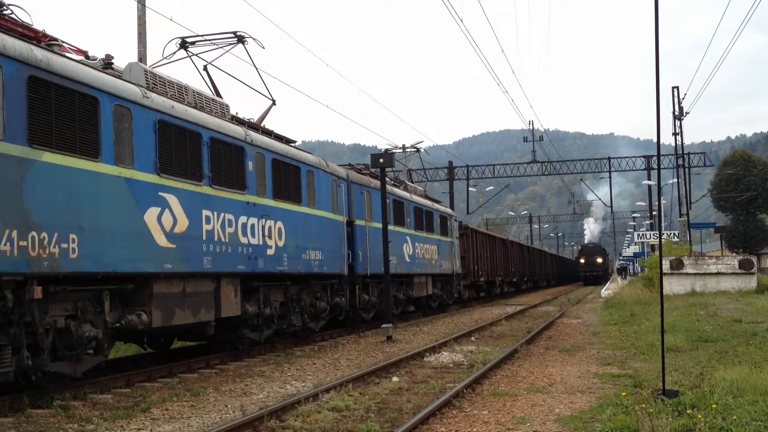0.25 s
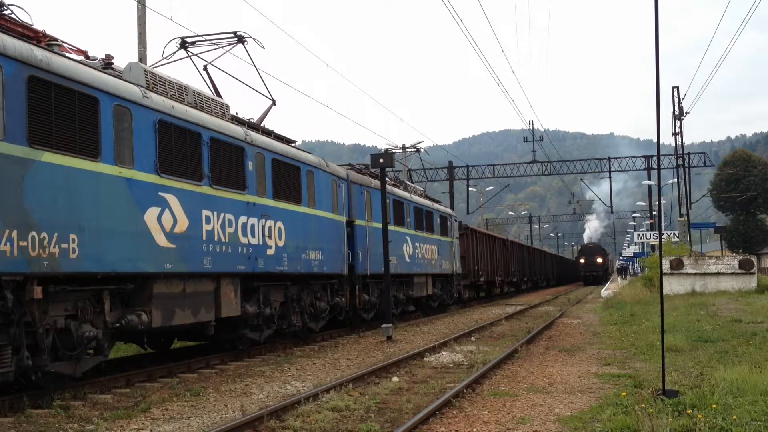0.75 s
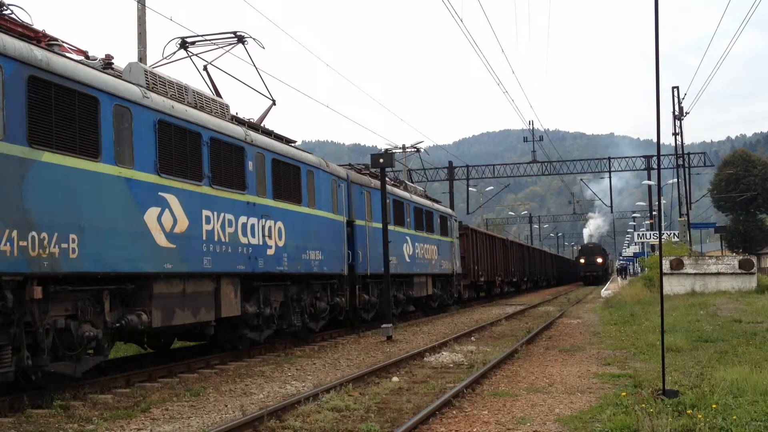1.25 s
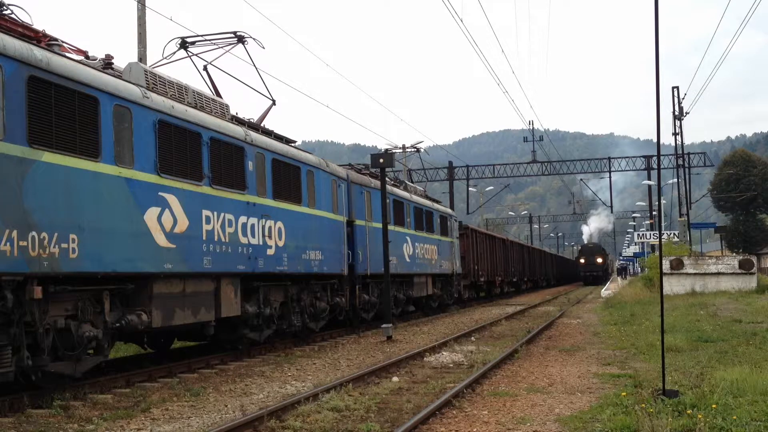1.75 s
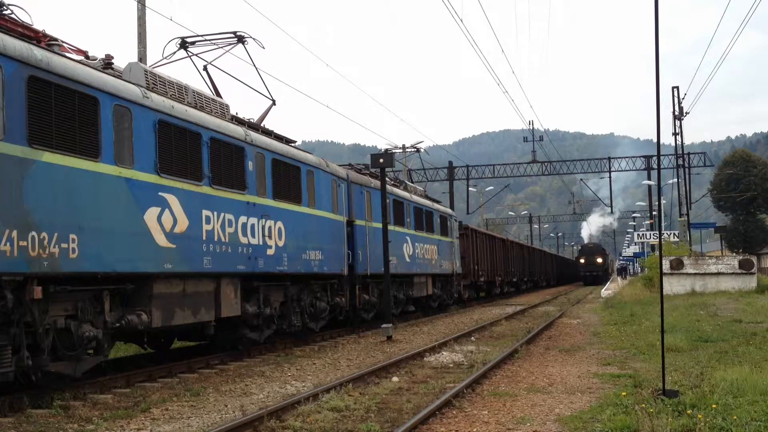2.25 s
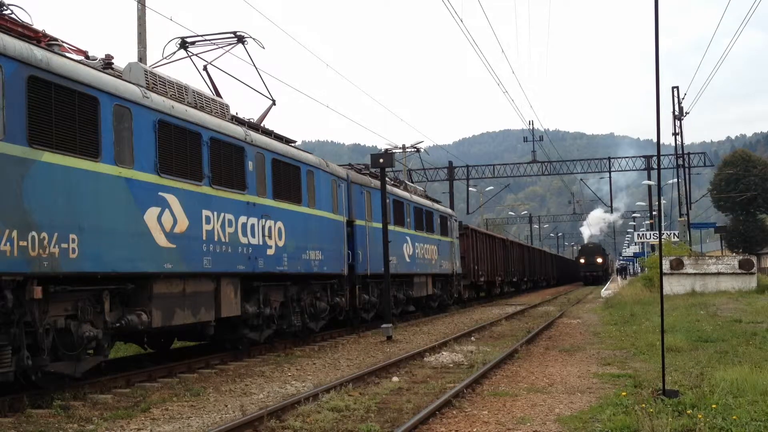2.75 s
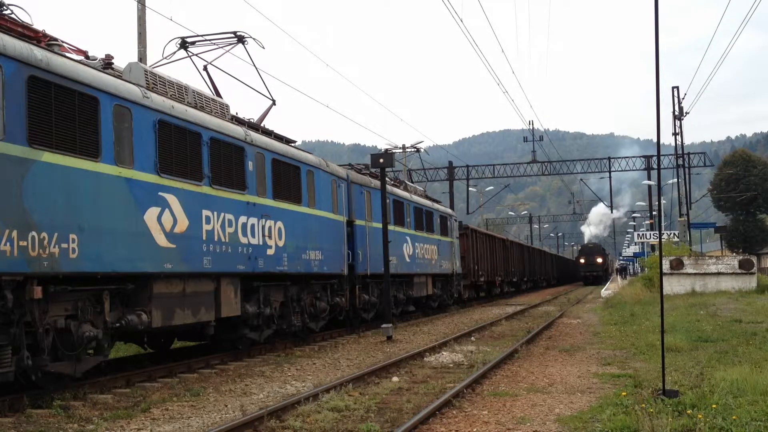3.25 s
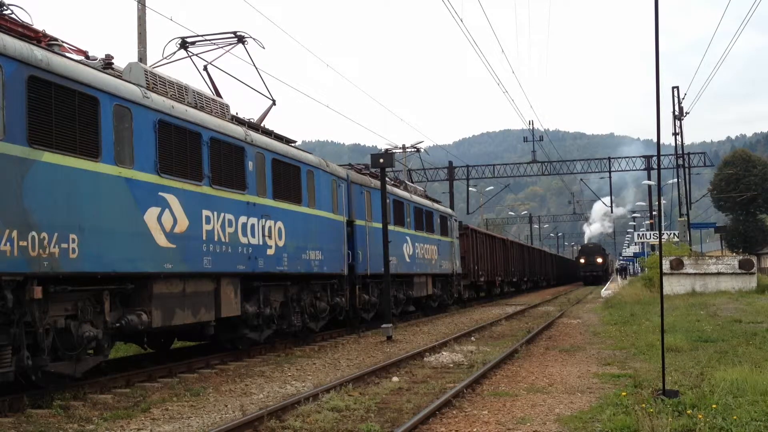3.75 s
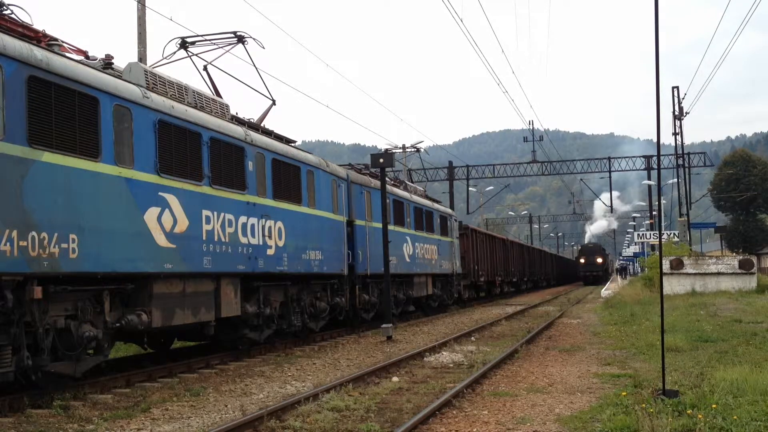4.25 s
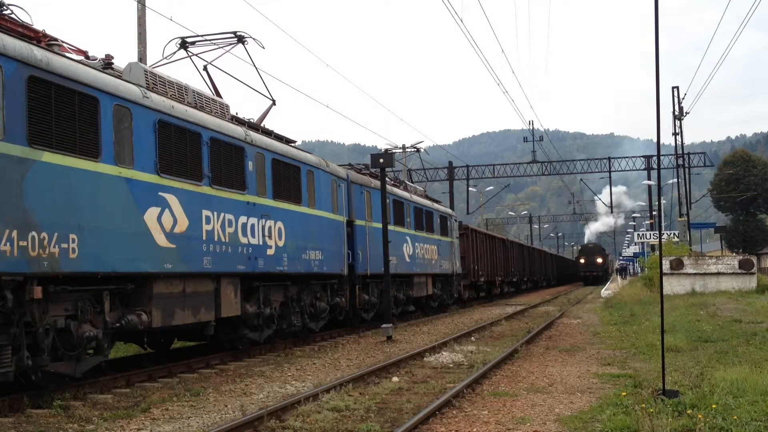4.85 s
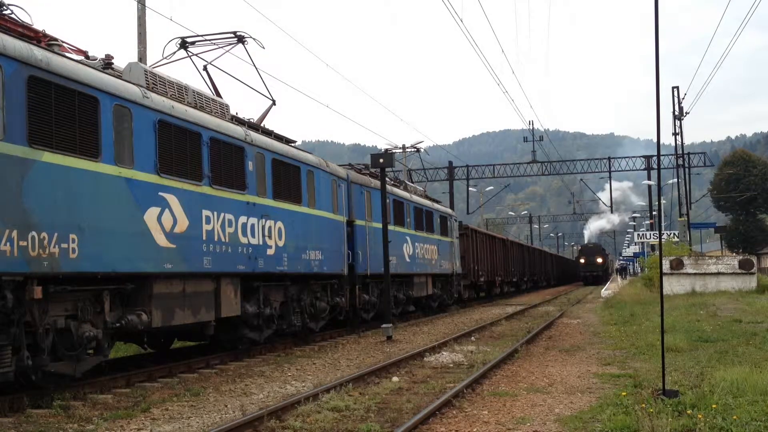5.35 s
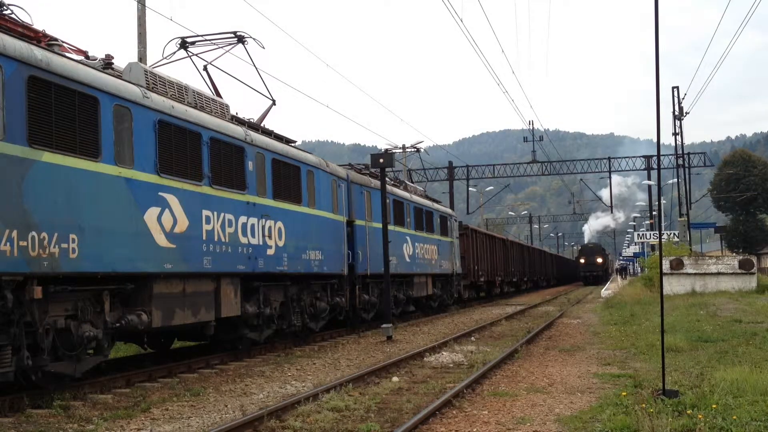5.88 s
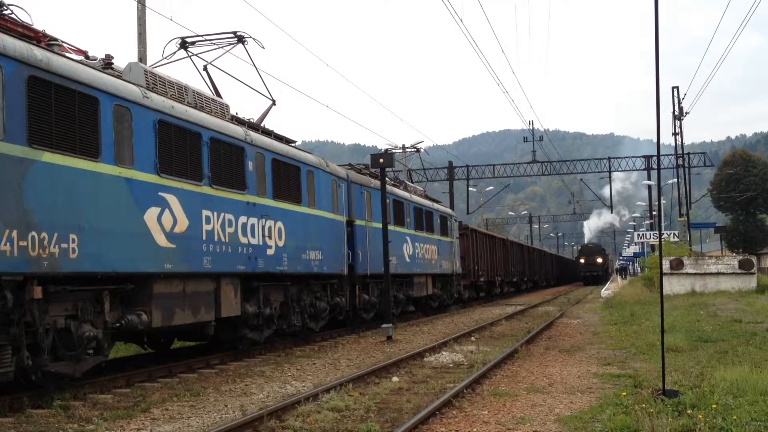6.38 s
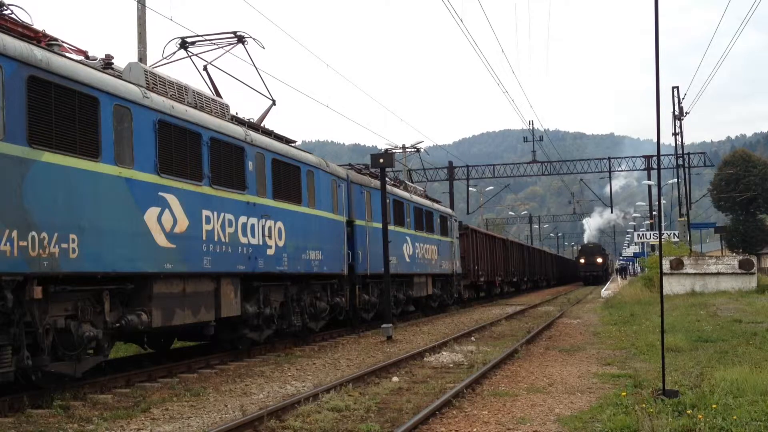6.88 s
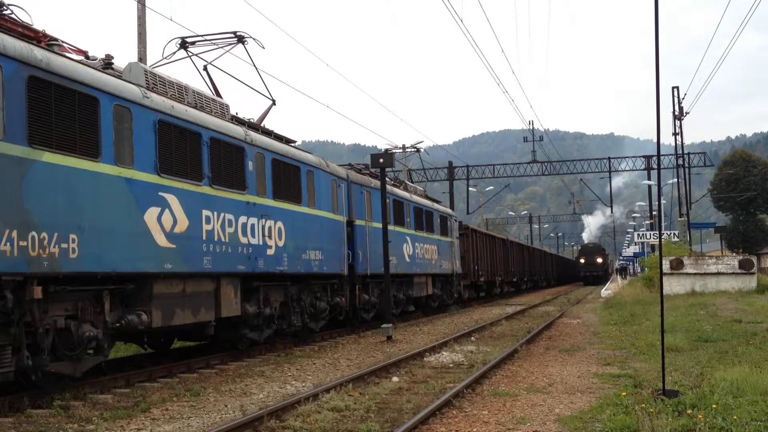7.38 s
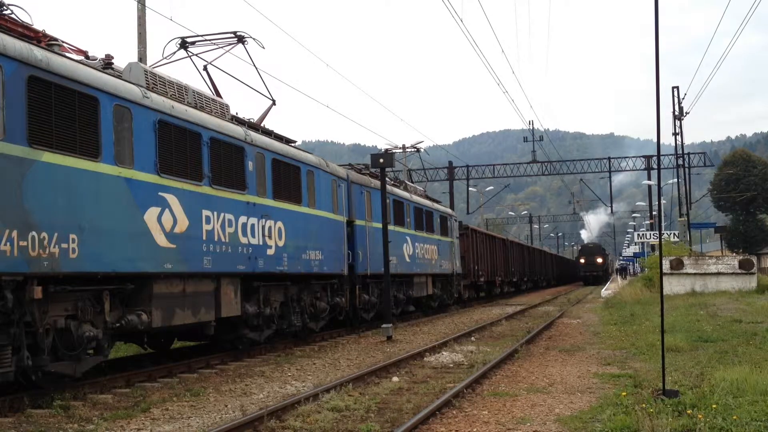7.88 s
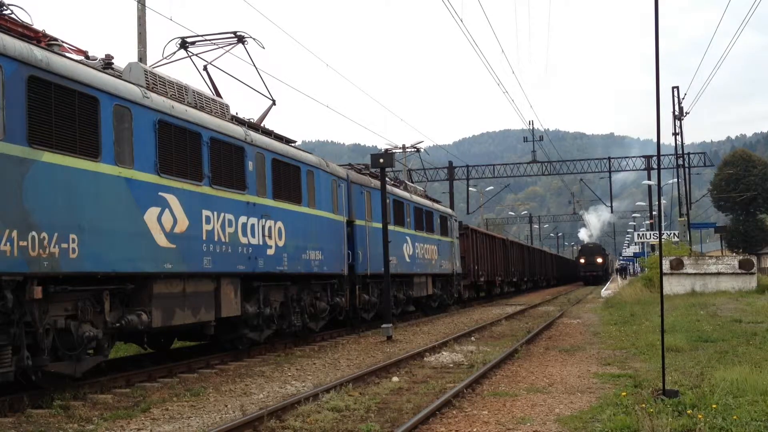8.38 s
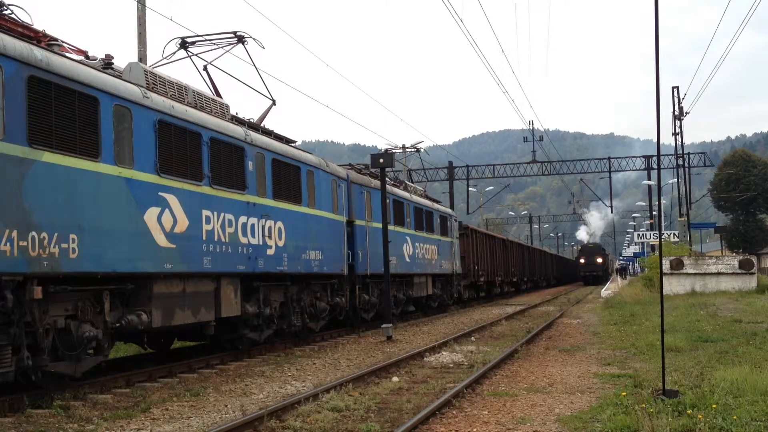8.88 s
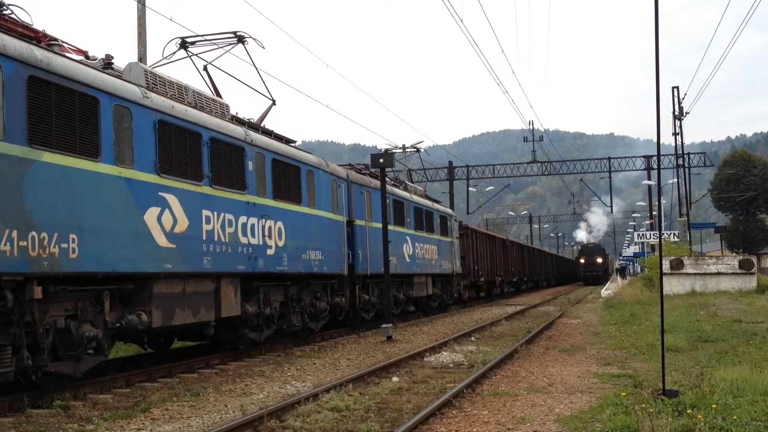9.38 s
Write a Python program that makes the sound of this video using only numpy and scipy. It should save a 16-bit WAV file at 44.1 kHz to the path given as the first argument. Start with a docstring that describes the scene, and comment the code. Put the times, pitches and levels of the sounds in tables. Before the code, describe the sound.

From 0 to about 9.6 seconds, the cooling blowers of a standing electric locomotive run without pause, heard in mono from a few metres away outdoors at a station. A low, hollow roar, strongest around 200 Hz, dominates and surges unevenly by small amounts; its deepest part fills out around 3.5 to 6 seconds. Above it, air rushes through ducts and louvres with a coloured, swirling texture. A wavering hum near 600 Hz sinks very slightly around 2.5 seconds and becomes clearer from 3 seconds on, with a weaker drifting tone beside it and faint higher whines. Motor brushes add a fine hiss around 4 kHz, fluttering about seventeen times a second. Dull air puffs knock the microphone at 2.5, 4.4 (strongest), then lightly from 5.3 to 6.3. Faint upward-sliding pips, almost buried, come near 0.5, 1.4, 3.8, 4.1, 8.3 and 8.8. It ends still running.

```python
"""At a station, a few metres from a standing electric locomotive with its cooling blowers running.
Shaped noise makes the low roar in the body and the rush of air through ducts and louvres. Wavering sines
hum near 600 Hz and above. The motor brushes hiss in a slowly changing pattern tied to the shaft turn.
A few dull puffs of air, short decaying swings, knock the microphone; faint sliding pips sound far off."""
import sys
import numpy as np
from scipy import signal
from scipy.fft import rfft, irfft
from scipy.io import wavfile
from scipy.ndimage import uniform_filter1d, map_coordinates

SR = 44100
rng = np.random.default_rng(int(sys.argv[2]) if len(sys.argv) > 2 else 0)


def volts_from_db(level):
    """Convert decibel levels to linear amplitude ratios."""
    exponent = np.asarray(level, float) / 20
    return 10 ** exponent


def put_to_file(sound):
    """Save the sound as 16-bit audio at rate SR, in the file named by the first command-line argument."""
    columns = np.atleast_2d(sound).T  # one column per channel
    safe = np.clip(columns, -1, 1)
    whole_steps = np.round(safe * 32767)
    wavfile.write(sys.argv[1], SR, whole_steps.astype(np.int16))


N = 424683
T = np.arange(N) / SR
BIN_HZ = np.arange(N // 2 + 1) * SR / N


def level(x, rms_db):
    """Scale to an rms level."""
    return x * volts_from_db(rms_db) / np.sqrt(np.mean(x ** 2))


def colour(x, points, peaks=()):
    """Shape a sound by a smooth spectrum with resonances standing on it."""
    hz = np.maximum(BIN_HZ, 1)
    at_hz, db = np.transpose(points)
    power = volts_from_db(np.interp(np.log(hz), np.log(at_hz), db, left=-70, right=-70)) ** 2
    for peak_hz, width_hz, peak_db in peaks:
        detune = 2 * (hz - peak_hz) / width_hz
        power = power * (1 + (volts_from_db(peak_db) ** 2 - 1) / (1 + detune ** 2))
    return irfft(rfft(x) * np.sqrt(power), N)


def walk(rate_hz):
    """Random levels held 1 / rate_hz and smoothed twice over that span; standard deviation 1."""
    hold = int(SR / rate_hz)
    steps = np.repeat(rng.standard_normal(N // hold + 1), hold)
    smooth = uniform_filter1d(uniform_filter1d(steps, hold), hold)[:N]
    return smooth / smooth.std()


def roar():
    """Turbulence off the impellers booms in the body and surges unevenly; its deepest part has its own level."""
    # roar level: time_s, rms_db
    surge = [(0, -29.5), (1.5, -27.5), (2.8, -28.5), (3.3, -30), (4.0, -27.5), (5.2, -29), (6.3, -27.5),
             (7.2, -28.5), (8.6, -29), (9.63, -27.5)]
    # smooth spectrum: pitch_hz, relative_db_per_hz
    spectrum_points = [(15, -75), (25, -45), (37, -45.5), (59, -29), (72, -26), (91, -13.5), (119, -10),
                       (137, -7), (203, 0), (270, -6.5), (355, -13.5), (485, -25.5), (560, -41), (730, -48),
                       (1230, -120)]
    # body booms: pitch_hz, width_hz, db_over_roar
    body_booms = [(146.4, 6.1, 2.5), (178.7, 6.9, 4), (213, 12, 1.5), (270, 12, 1), (288, 9.6, 1.5),
                  (341, 12, 1)]
    # gain of the deepest roar: time_s, gain_db
    deep_gain = [(0, -2.5), (2.2, -2), (3.2, 0), (3.7, 2.5), (4.4, 1.5), (4.8, 1), (5.6, 1.5), (7, -0.8),
                 (9.63, -1)]
    deep_below_hz = 143

    flutter = volts_from_db(0.36 * walk(rate_hz=15) + 0.96 * walk(rate_hz=3.49))
    boom = level(colour(flutter * rng.standard_normal(N), spectrum_points, body_booms), 0)
    low_pass = signal.butter(2, deep_below_hz, fs=SR, output="sos")
    deep = signal.sosfiltfilt(low_pass, boom)
    extra_deep = (volts_from_db(np.interp(T, *np.transpose(deep_gain))) - 1) * deep
    return volts_from_db(np.interp(T, *np.transpose(surge))) * (boom + extra_deep)


def air(turns):
    """The rush off the blades through ducts and louvres, swelling a little and throbbing once a shaft turn."""
    # smooth spectrum: pitch_hz, relative_db_per_hz
    spectrum_points = [(250, -32), (480, 0), (620, -3.5), (740, -7), (1000, -1.5), (1500, -6), (2200, -8),
                       (2900, -14.5), (3800, -15.5), (5200, -24.5)]
    # duct resonances: pitch_hz, width_hz, db_over_rush
    duct_modes = [(612, 31, 9), (879, 23, 6), (898, 19, 2), (1038, 18, 5.5), (1110, 62, 3.5), (1361, 61, 8),
                  (1864, 84, 4), (2332, 41, 7.5), (2720, 27, 5), (3100, 59, 7.5), (3344, 24, 6.5),
                  (3490, 37, 9)]

    throb = 1 + 0.07 * np.cos(2 * np.pi * (turns - 0.88))
    swell = volts_from_db(0.5 * walk(rate_hz=3.08))
    rush = colour(swell * turning_noise(turns, throb), spectrum_points, duct_modes)
    return level(panels(swirl(rush), ripple_db=0.4, spacing_hz=25), rms_db=-40.5)


def swirl(x):
    """Eddies in the ducts: overlapping bands a fifth of an octave apart swell and sink on their own."""
    swirl_db, swirl_rate_hz, spacing_octaves = 1.2, 9, 0.2
    octave = np.log2(np.maximum(BIN_HZ, 1))
    spectrum = rfft(x)
    out = x.copy()
    for centre in np.arange(9.5, 11.9, spacing_octaves):  # log2 of Hz
        weight = np.clip(1 - np.abs(octave - centre) / spacing_octaves, 0, 1)
        band = irfft(spectrum * weight, N)
        out += (volts_from_db(swirl_db * walk(swirl_rate_hz)) - 1) * band
    return out


def hum():
    """The main hum sinks a little, a second blower's hum wanders beside it, weaker tones stand above."""
    # main hum pitch: time_s, pitch_hz
    main_pitch = [(0, 601.2), (2.4, 601.0), (2.8, 599.6), (9.63, 599.0)]
    # main hum strength: time_s, rms_db
    main_strength = [(0, -48), (1, -47.5), (2, -48), (2.6, -46), (3.4, -44.5), (4.6, -43), (5.7, -44.5),
                     (7, -43), (8.2, -42.5), (9.3, -43.5), (9.63, -44.5)]
    # second blower's hum: time_s, pitch_hz, rms_db
    second_blower = [(0, 623, -53), (2, 629.5, -63), (4, 630.6, -52.5), (6.5, 623, -62), (8, 627, -53),
                     (9.63, 618, -54)]
    # weaker tones: pitch_hz, rms_db
    weak_tones = [(1359, -61.5), (1976, -68)]

    main_hz = np.interp(T, *np.transpose(main_pitch))
    main_db = np.interp(T, *np.transpose(main_strength))
    out = tone(main_hz, main_db, waver_db=1.2, waver_hz=0.1)
    time_s, pitch_hz, rms_db = np.transpose(second_blower)
    second_hz = np.interp(T, time_s, pitch_hz)
    second_db = np.interp(T, time_s, rms_db)
    out = out + tone(second_hz, second_db, waver_db=4, waver_hz=2.5)
    for hz, db in weak_tones:
        out = out + tone(hz, db, waver_db=5.5, waver_hz=1.55)
    return out


def tone(hz, rms_db, waver_db, waver_hz):
    """A sine whose strength and pitch waver slightly on the way through the air."""
    phase = 2 * np.pi * np.cumsum(hz + waver_hz * walk(rate_hz=6)) / SR
    return np.sqrt(2) * volts_from_db(rms_db + waver_db * walk(rate_hz=9)) * np.sin(phase)


def brushes(turns):
    """Brush hiss that swells with the shaft's runout and flares briefly at each rough commutator spot."""
    # smooth spectrum: pitch_hz, relative_db_per_hz
    spectrum_points = [(1500, -18), (3000, -10.5), (3900, -11), (4230, -1), (4450, 0.5), (4800, -6.5),
                       (4950, -14), (5800, -18.5), (7500, -15.5), (8300, -25.5), (9000, -35), (10000, -26),
                       (11000, -44), (15250, -38)]
    # brush gear resonances: pitch_hz, width_hz, db_over_hiss
    gear_modes = [(4120, 20, 3), (4244, 16, 5), (4347, 12, 5), (4569, 18, 4), (4697, 25, 4.5),
                  (4800, 12, 5.5), (6640, 100, 4)]
    # rough spots: place_turns (0-1), scrape_db over the smooth hiss
    rough_spots = [(.05, -3), (.135, 0), (.195, 1.5), (.315, -2), (.5, -2), (.59, -5), (.835, -3)]
    flare_fade_turns = 0.022

    power = 1 + 0.3 * np.cos(2 * np.pi * (turns - 0.25))
    for place, scrape_db in rough_spots:
        since_spot = (turns - place) % 1
        power = power + volts_from_db(scrape_db) ** 2 * np.exp(-since_spot / flare_fade_turns)
    scrape = colour(turning_noise(turns, np.sqrt(power)), spectrum_points, gear_modes)
    return level(panels(scrape, ripple_db=0.8, spacing_hz=25), rms_db=-48)


def shaft_turns():
    """Turns made so far; the blower shaft slows steadily and trembles very slightly."""
    start_hz, sag_hz_per_s, tremble_hz = 16.969, 0.0136, 0.002
    return np.cumsum(start_hz - sag_hz_per_s * T + tremble_hz * walk(rate_hz=4)) / SR


def turning_noise(turns, shape):
    """Noise off a rotor: partly the same surface passing again and slowly changing, partly fresh."""
    # share of power from the returning surface: pitch_hz, share (0-1)
    returning = [(500, .1), (1200, .15), (2000, .2), (3000, .4), (4500, .5), (6500, .52), (10000, .45)]
    points_per_turn, memory = 2600, 0.96  # memory: correlation from turn to turn

    rows = rng.standard_normal((int(turns[-1]) + 2, points_per_turn))
    for k in range(1, len(rows)):
        rows[k] = memory * rows[k - 1] + np.sqrt(1 - memory ** 2) * rows[k]
    surface = level(map_coordinates(rows.ravel(), [turns * points_per_turn], order=3), 0)
    share = np.interp(BIN_HZ, *np.transpose(returning))
    repeated = np.sqrt(share) * rfft(shape * surface)
    fresh = np.sqrt(1 - share) * rfft(shape * rng.standard_normal(N))
    return irfft(repeated + fresh, N)


def panels(x, ripple_db, spacing_hz):
    """Countless small panel modes and echoes make the spectrum ragged."""
    k = int(spacing_hz * N / SR)
    ripple = uniform_filter1d(uniform_filter1d(rng.standard_normal(N // 2 + 1), k), k)
    return irfft(rfft(x) * volts_from_db(ripple_db * ripple / ripple.std()), N)


def puffs():
    """Short dull pushes of air swing for a few cycles toward a resting pitch; the microphone cuts their bass."""
    # puffs: start_s, peak_db before the bass cut, start_hz, direction (+-1), fade_ms
    pushes = [(2.5263, -17, 560, 1, 1.5), (2.5276, -19, 800, 1, 1.5), (2.5284, -9, 195, -1, 11),
              (2.5302, -19, 620, 1, 4), (4.3630, -15, 690, 1, 2.8), (4.3675, -19, 180, 1, 10),
              (4.4403, -6.5, 320, 1, 4.5), (5.2621, -21, 540, 1, 4), (5.7140, -17.5, 480, 1, 4),
              (5.8414, -17.5, 290, -1, 6), (5.9780, -13, 230, 1, 8), (6.271, -23.5, 480, 1, 4)]
    rest_hz, glide_ms, rise_cycles = 190, 3, 0.08
    low_cut = signal.butter(3, 85, "high", fs=SR, output="sos")
    dull = signal.butter(3, 850, fs=SR, output="sos")

    out = np.zeros(N)
    t = np.arange(4096) / SR
    for start_s, peak_db, hz, direction, fade_ms in pushes:
        start = int(start_s * SR)
        glide = (hz - rest_hz) * glide_ms / 1000 * (1 - np.exp(-1000 * t / glide_ms))
        cycles = rest_hz * t + glide
        envelope = (1 - np.exp(-hz * t / rise_cycles)) * np.exp(-1000 * t / fade_ms)
        swing = signal.sosfilt(dull, np.sin(2 * np.pi * cycles) * envelope)
        out[start:start + len(t)] += direction * volts_from_db(peak_db) * swing / np.abs(swing).max()
    return signal.sosfiltfilt(low_cut, out)


def pips():
    """Brief soft tones under a bell-shaped envelope, barely above the rush, sliding up a little."""
    # far pips: centre_s, peak_db, centre_hz, length_ms (between 1/e points), slide_hz_per_s
    far_pips = [(.48, -42, 694, 70, 600), (1.40, -47, 717, 90, 100), (3.76, -38.5, 635, 87, 400),
                (4.05, -40, 680, 82, 800), (8.32, -38, 643, 55, 300), (8.8, -51, 646, 90, 100)]
    out = np.zeros(N)
    for centre_s, peak_db, hz, length_ms, slide in far_pips:
        t = T - centre_s
        envelope = np.exp(-(2000 * t / length_ms) ** 2)
        out += volts_from_db(peak_db) * envelope * np.sin(2 * np.pi * (hz + slide * t / 2) * t)
    return out


def microphone_hiss():
    """Steady faint noise of the microphone itself."""
    # smooth spectrum: pitch_hz, relative_db_per_hz
    spectrum_points = [(7000, -10), (9000, -5), (12000, 1), (15250, 0.5)]
    return level(colour(rng.standard_normal(N), spectrum_points), rms_db=-76.5)


def scene():
    """All sources at the one microphone; air and brushes share the shaft turns."""
    turns = shaft_turns()
    mix = roar() + air(turns) + hum() + brushes(turns) + puffs() + pips()
    return mix[None]


def band_limit(x):
    """A steep low-pass at the top of the band."""
    return signal.sosfilt(signal.butter(12, 15340, fs=SR, output="sos"), x)


def record(dry):
    """The microphone adds its own faint hiss."""
    return band_limit(dry + microphone_hiss())


dry = scene()
out = record(dry)
put_to_file(out)
```